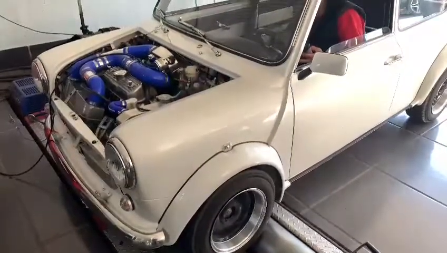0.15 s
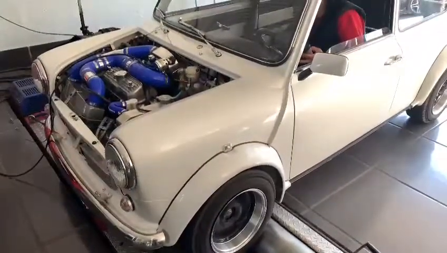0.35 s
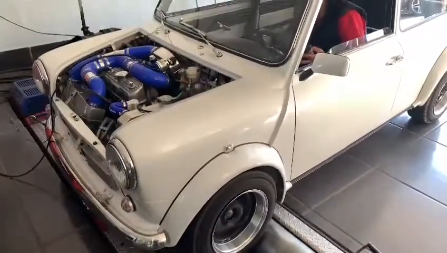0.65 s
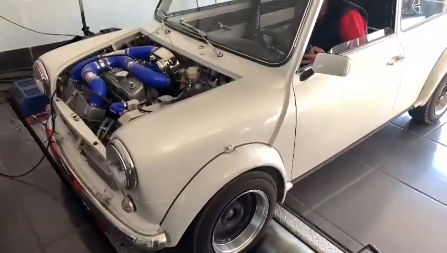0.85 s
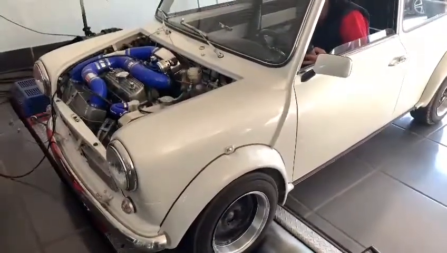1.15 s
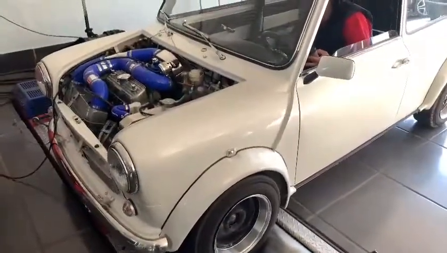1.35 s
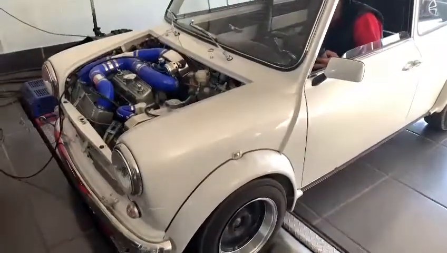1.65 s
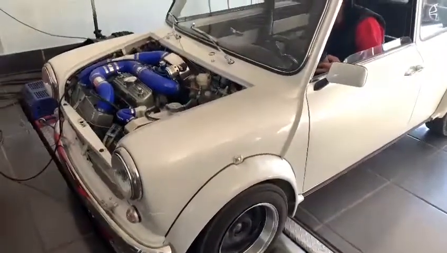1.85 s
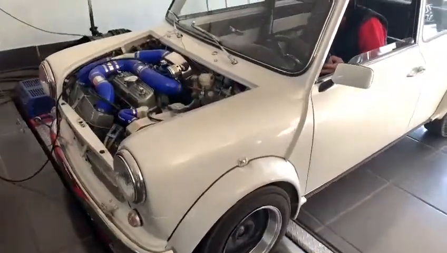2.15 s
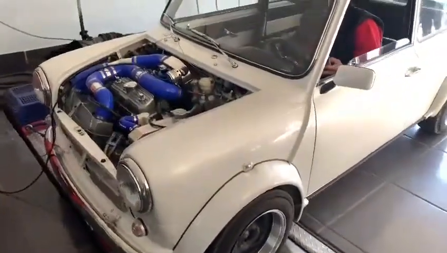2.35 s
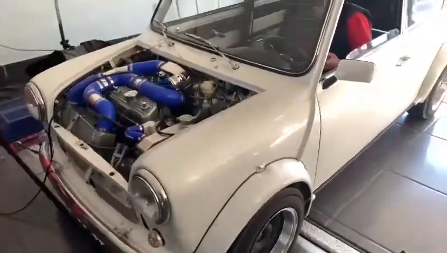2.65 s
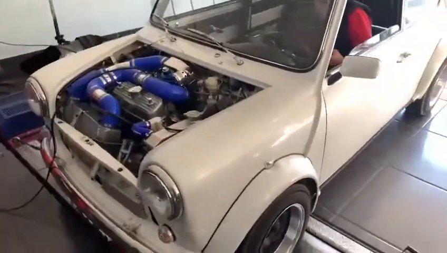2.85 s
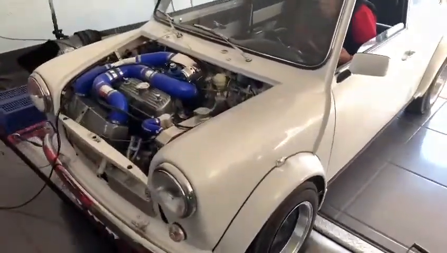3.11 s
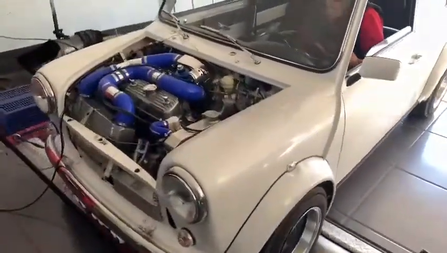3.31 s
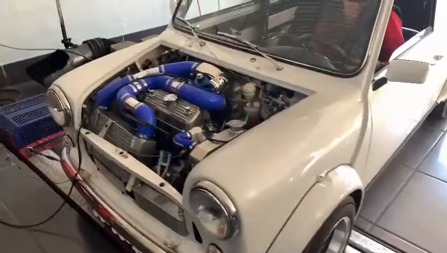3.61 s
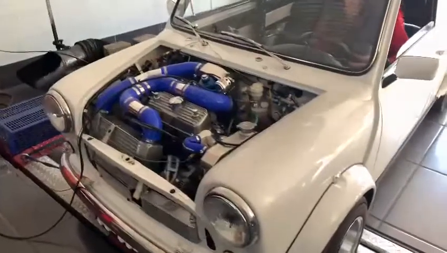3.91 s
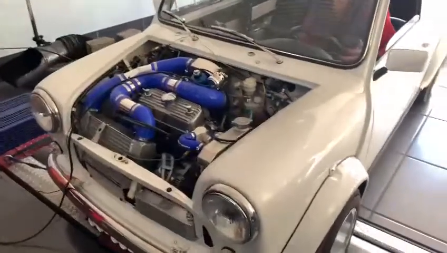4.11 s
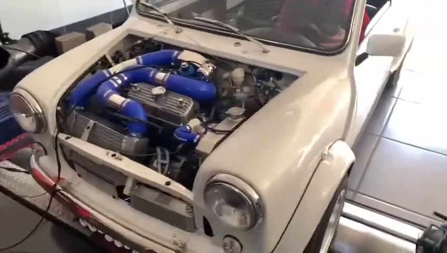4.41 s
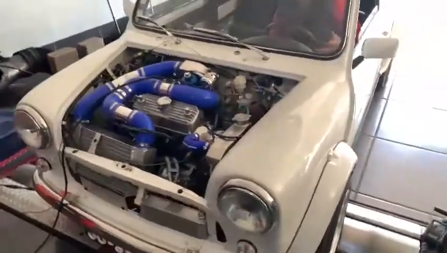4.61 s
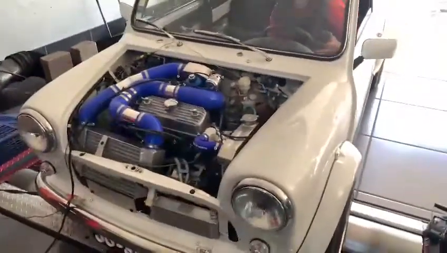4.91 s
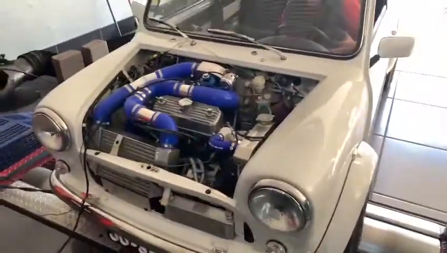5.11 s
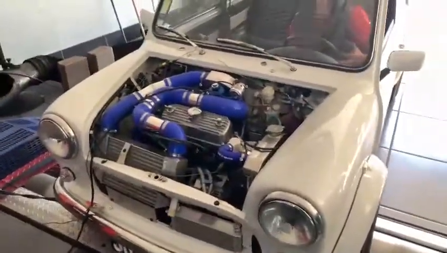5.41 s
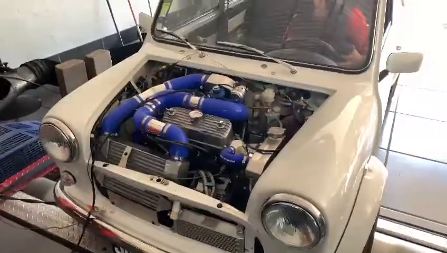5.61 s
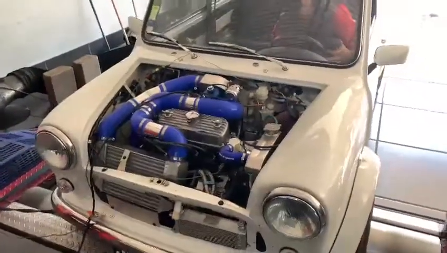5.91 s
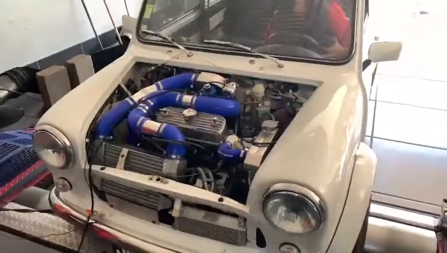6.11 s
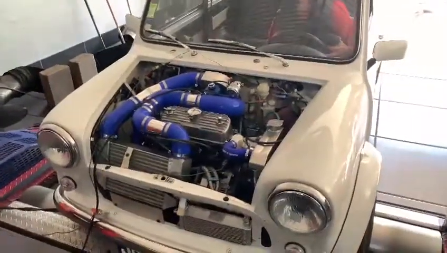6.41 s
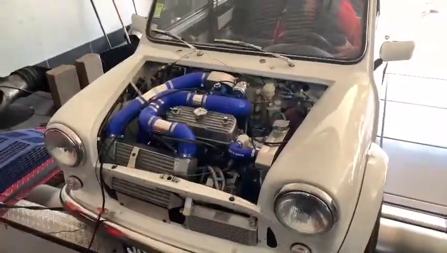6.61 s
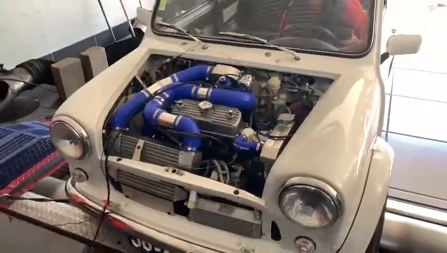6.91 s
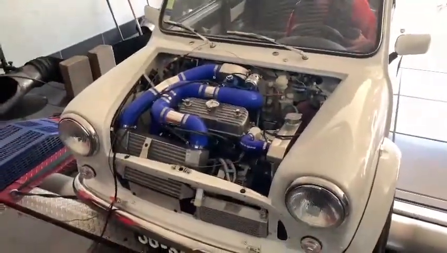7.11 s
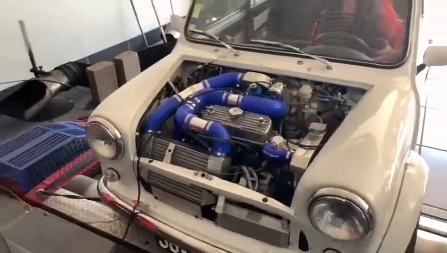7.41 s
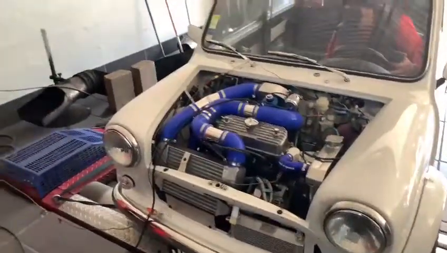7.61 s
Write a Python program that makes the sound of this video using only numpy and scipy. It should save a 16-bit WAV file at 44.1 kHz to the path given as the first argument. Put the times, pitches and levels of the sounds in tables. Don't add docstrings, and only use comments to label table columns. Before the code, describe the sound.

A small turbocharged car engine idles steadily in a tiled workshop, humming and whirring, its gear whine sharpening as the microphone moves toward the nose.

```python
import sys
import numpy as np
from scipy import signal
from scipy.io import wavfile
from scipy.ndimage import uniform_filter1d

SR = 44100
rng = np.random.default_rng(int(sys.argv[2]) if len(sys.argv) > 2 else 0)


def persist_wave(psi):
    counts = np.round(np.clip(psi, -1, 1) * 32767).astype(np.int16)
    wavfile.write(sys.argv[1], SR, np.atleast_2d(counts).T)


def gain_from_decibels(decibels):
    exponent = np.asarray(decibels, float) / 20
    return 10 ** exponent


N = 341775

# (time [s], place [0-3])
WALK_PLACE = [
    (0, 0),
    (2.2, .05),
    (3.1, 1),
    (4.3, 2),
    (5.5, 2.9),
    (7.75, 3),
]
# (time [s], view [0-3])
WALK_VIEW = [
    (0, 0),
    (1.4, .1),
    (2.7, .5),
    (3.0, 1),
    (4.76, 1.15),
    (4.87, 2),
    (5.4, 2.1),
    (5.9, 3),
    (7.75, 3),
]
# (time [s], share [0-1])
WALK_SHARE = [
    (0, 0),
    (2.0, 0),
    (2.8, .3),
    (3.6, .52),
    (4.4, .7),
    (5.6, .87),
    (7.75, 1),
]
# (centre [s], half length [s], line [Hz], gain [dB])
GLINTS = [(7.78, 0.77, 166, 5.5), (7.75, 0.24, 582, 0), (7.5, 0.61, 250, -3), (6.9, .7, 208, -3),
          (4.83, .3, 958, -9), (4.25, 0.36, 958, 3), (2.6, 0.34, 958, -2.5), (4.4, 0.23, 333, -13),
          (5.0, 0.062, 1915, 2.5), (2.2, .35, 2870, -11), (3, 0.25, 2870, -5), (4.5, 0.097, 2870, 7),
          (6.12, .15, 2870, -4.5), (6, 0.11, 2870, 7), (7.3, .12, 2870, 0), (5.9, 0.24, 3830, -1.5),
          (1.9, .4, 3830, 0.5), (4.3, 1.2, 5745, -8.5), (3.26, 0.17, 502, 10.5), (4.8, .3, 720, -27),
          (8.7, 0.11, 580, 10), (1.2, 0.26, 566, -2), (3.68, 0.17, 566, -8), (6.5, .12, 430, 9),
          (7.1, .2, 530, -11), (4.79, 0.16, 682, 10.5), (2.75, 0.14, 416, 4.5), (6.4, .2, 502, 2.5),
          (5.4, .3, 566, 0)]

# (time [s], firing rate [Hz])
FIRING_HZ = [
    (0.0, 41.595),
    (0.75, 41.61),
    (2.0, 41.56),
    (2.4, 41.58),
    (2.8, 41.545),
    (3.75, 41.56),
    (4.75, 41.64),
    (5.5, 41.675),
    (6.5, 41.665),
    (7.75, 41.6),
]
# (firing order, wing [dB], wheel arch [dB], headlamp [dB], nose [dB])
HUM_ORDER_DB = [(1, -62, -67, -59, -55), (2, -26.5, -31.5, -36.5, -52), (3, -28.5, -28, -31, -30),
                (4, -22, -21, -24, -28.5), (5, -36, -29.5, -29, -31.5), (6, -60, -34, -31, -37),
                (7, -39, -37, -31.5, -36), (8, -32.5, -27.5, -43, -32.5), (9, -76, -52, -44, -42),
                (10, -39, -37.5, -37, -54), (14, -36.5, -44, -49, -45.5), (16, -46, -56, -39.5, -48),
                (17, -49.5, -71, -52, -54), (18, -49, -48, -45, -55), (20, -48.5, -61, -52, -49),
                (25, -47.5, -51, -59, -47.5)]
# (place [0-3], order 2 [dB], order 4 [dB], others [dB])
HUM_PAN_DB = [(0, -3.5, -3.2, -7.5), (1, -5, -6.5, -6), (2, -6, -13, -7.5), (2.25, -10, -17, -6),
              (2.8, -6, -2.5, -5), (3, -5, -1.5, -5.5)]
HUM_LEAD_RAD = {2: (-.3, -.5), 5: (-1.3, -.35), 6: (0, -.9), 7: (-1.3, -.1), 8: (-.7, .7), 10: (3, -.3),
                14: (-.1, -.1)}

# (view [0-3], mesh tone [dB], 2nd harmonic [dB], 3rd [dB], upper harmonics [dB])
WHINE_DB = [(0, -49, -39.5, -31.5, -40.5), (1, -34.5, -36, -32.5, -41), (2, -35.5, -33, -53.5, -43.5),
            (3, -28.5, -35, -39.5, -39.5)]
WHINE_UPPER_DB = [2, -4, -4, -12.5, -19]
WHINE_LOW_LEAD = [(0, .6, 4.3, 4.2), (.33, 1.1, 3.6, 4), (.4, 1.6, 5.9, 4.4), (.6, 1.2, 6.4, 4.8),
                  (1, .6, 3.2, 5.1), (1.15, 1.3, 3.1, 5.3), (2, -1, .3, 4.5), (3, .35, 1.15, 5.8)]
WHINE_UPPER_LEAD_RAD = [-2, 1.5, 7.5, 8.5, -1]

# (view [0-3], order 39 [dB], 44 [dB], 53 [dB], 90 [dB])
FAN_DB = [(0, -36, -39.5, -44.5, -46), (1, -43.5, -40.5, -44, -43), (2, -30, -34, -45, -41.5),
          (3, -28, -34.5, -45, -39.5)]
FAN_WING_LEAD_RAD = [2, -0.39, -0.14, 1.8]
# (shaft order, wing [dB], nose [dB])
FAN_WEAK_DB = [(34, -71, -45.5), (37, -43.5, -49), (38, -81, -75), (40, -75, -42), (42, -64, -44),
               (55, -48.5, -66), (77.2, -47.5, -67), (77, -73, -55), (84.6, -61, -48), (91.9, -84, -52),
               (91.4, -45, -37.5), (101.3, -52, -52), (102.1, -42.5, -68), (103.5, -40, -53),
               (104.8, -50, -56), (107.25, -68, -41.5), (110.3, -44, -56), (152.9, -47, -49.5),
               (164.2, -47, -70), (185.6, -68, -83), (238, -97, -45), (236.7, -46, -38.5)]

# (frequency [Hz], wing [dB per Hz], corner [dB per Hz], nose [dB per Hz])
ROAR_DB = [(25.0, -79, -75.9, -80), (55.0, -71, -74, -76), (97, -58.5, -54.5, -55),
           (192, -59.5, -59.5, -56.5), (423, -62.5, -58.5, -63), (614, -60, -66.5, -61),
           (910, -67, -62.5, -63.5), (1205, -60, -60.5, -59.5), (1537, -65.5, -64, -63.5),
           (2286, -63.5, -63, -61.5), (2950, -63.5, -63, -65), (3995, -70, -70.5, -67),
           (6330, -77, -71.5, -71.5), (11000, -79, -77.5, -77)]
ROAR_PASS_S = [2.2, 3.65, 6.8]
# (centre [Hz], width [Hz], gain [dB])
ROAR_RINGS = [(307, 22, 4), (560, 57, 4.5), (937, 110, 5), (1080, 170, 1), (1798, 220, 1.5),
              (2139, 43, 7.5), (2853, 43, 9), (3170, 150, 2), (3852, 70, 8), (4780, 100, 1.5),
              (5740, 51, 9.5), (6588, 580, 5), (7620, 560, -3), (8950, 1600, 7), (375, 44, -6.5),
              (1647, 170, -1.5), (2327, 130, -4), (3174, 240, -2.5)]
# (frequency [Hz], common share [0-1], left over right [dB])
PORT_SPREAD = [(30, .85, -.5), (150, .9, -3.5), (500, .75, .3), (1200, .5, 1.5), (2200, .3, -.8),
               (3300, .35, -1.8), (4500, .65, -1.5), (5600, .3, -3.5), (6500, .45, -.6), (7200, .8, 0),
               (11000, .75, 0)]

JOINT_BAND_LINES = [64, 72, 80, 88, 96, 108, 120, 132, 144, 160, 176, 196, 216, 240, 264, 292, 320, 352, 384,
                    416, 448, 480, 496, 506, 556]
# (frequency [Hz], starving margin of mid or side under the other [dB], step over band
# level [dB])
JOINT_STARVE = [(1640, 6.0, .5), (1950, 8.5, -3), (2400, 5.5, 1), (2850, 8.5, -2.5), (3350, 2.2, 2.5),
                (3900, 7.0, -1.5), (4400, 4.5, 1), (5400, 2.2, 2), (5900, 5.5, -1), (6500, 5.0, 0),
                (7200, 2.0, -1.5), (7900, 1.4, -1), (8600, .2, -3), (10000, .3, -1.5), (10500, 4.5, 2.5),
                (10800, 1.0, 5), (11300, -30, 5)]

FAN_SHAFT_HZ, PORT_DELAY_S = 12.865, .000214
START_CYCLES = .385


def evened(x):
    return x / np.sqrt(np.mean(x ** 2) + 1e-20)


def columns(table, t):
    s, *rest = np.transpose(table)
    return [np.interp(t, s, c) for c in rest]


def drift(rate_hz, count):
    steps = rng.standard_normal((N // 64 + 802, count))
    low_pass = signal.butter(2, rate_hz * 128 / SR, output="sos")
    slow = signal.sosfiltfilt(low_pass, steps, axis=0)[400:-400]
    return [evened(np.interp(np.arange(N) / 64, np.arange(len(c)), c)) for c in slow.T]


def tone(db, angle, pan_db, lead_rad):
    side = np.array([[.5], [-.5]])
    wave = np.sqrt(2) * gain_from_decibels(db + side * pan_db) * np.cos(angle + side * lead_rad)
    return wave / np.sqrt(np.cosh(pan_db * np.log(10) / 20))


def glint_db(t, hz):
    return sum(db * np.exp(-((t - s) / half) ** 2)
               for s, half, line_hz, db in GLINTS if abs(line_hz / hz - 1) < .012)


def hum(t, turns):
    place = columns(WALK_PLACE, t)[0]
    pan_two, pan_four, pan_rest = columns(HUM_PAN_DB, place)
    walk = columns(WALK_SHARE, t)[0]
    arch_rad = np.interp(place, [0, 1.2, 2.1, 2.4], [0, .14, .18, 0])
    shake = drift(38.0, count=2 * len(HUM_ORDER_DB))
    out = np.zeros((2, N))
    for n, (k, *db) in enumerate(HUM_ORDER_DB):
        k = round(k)
        pan_db = pan_two if k == 2 else pan_four if k == 4 else pan_rest * (k < 10)
        if k in (5, 6, 8):
            pan_db = pan_db * np.minimum(place + .2, 1)

        if 4 < k < 8:
            path_rad = .4 - 1.35 * (k - 5) - (3.6 + .9 * (k - 5)) * walk
        elif k == 8:
            path_rad = 1.5
        else:
            path_rad = .3 * (k - 3.6) ** 2 - (k == 2) * (walk - .2)
        if k % 4 == 0 or k == 10:
            path_rad = path_rad - k * arch_rad
        angle = 2 * np.pi * k * turns + path_rad + 0.0081 * k * shake[2 * n]

        level_db = np.interp(place, range(len(db)), db) + glint_db(t, k * FIRING_HZ[0][1])
        level_db += (0.049 + 0.11 * k) * shake[2 * n + 1]
        if k == 4:
            lead_rad = np.interp(place, [1.9, 2.4], [-.3, 1])
        else:
            lead_rad = np.interp(place, [0, 1.6], HUM_LEAD_RAD.get(k, (0, 0)))
        out += tone(level_db, angle, pan_db, lead_rad)
    return out


def whine(t, turns):
    view = columns(WALK_VIEW, t)[0]
    *db, upper_db = columns(WHINE_DB, view)
    db += [upper_db + step for step in WHINE_UPPER_DB]
    lead_rad = columns(WHINE_LOW_LEAD, view) + WHINE_UPPER_LEAD_RAD
    backlash, *flutter = drift(26.0, count=2 * len(db) + 1)
    fade = drift(3.0, count=len(db))
    surge = .22 * np.sin(2 * np.pi * turns / 4)
    mesh = 2 * np.pi * 23 * turns + surge + .24 * backlash
    load_db = 0.8 * np.cos(2 * np.pi * (turns - 1.65) / 4)
    out = np.zeros((2, N))
    for k, level_db in enumerate(db):
        level_db = level_db + glint_db(t, (k + 1) * 23 * FIRING_HZ[0][1])
        level_db = level_db + 2.5 * fade[k] * min(k / 5, 1) + .8 * flutter[2 * k] + load_db * min(k, 2)
        out += tone(level_db, (k + 1) * mesh, 1.5 - 0.65 * k, lead_rad[k] + 0.41 * flutter[2 * k + 1])
    return out


def fan(t):
    nose = np.clip((t - 2.5) / 3.1, 0, 1)
    view = columns(WALK_VIEW, t)[0]
    lines = list(zip((39, 44, 53, 90), columns(FAN_DB, view), FAN_WING_LEAD_RAD))
    lines += [(round(k), wing + (front - wing) * nose, 0) for k, wing, front in FAN_WEAK_DB]
    waver = drift(3.6, count=2 * len(lines))
    out = np.zeros((2, N))
    for n, (k, db, wing_lead) in enumerate(lines):
        hz = k * FAN_SHAFT_HZ
        level_db = db + glint_db(t, hz) + (1.1 + 0.0039 * k) * waver[2 * n]
        angle = 2 * np.pi * hz * t + n ** 2 + .006 * k * waver[2 * n + 1]
        lead_rad = 2 * np.pi * hz * PORT_DELAY_S + wing_lead * np.clip(1 - view, 0, 1)
        out += tone(level_db, angle, 0.32, lead_rad)
    return out


def roar(turns):
    frames, hz = N // 256 + 5, np.fft.rfftfreq(1024, 1 / SR)
    a, b, c, d, patches = rng.standard_normal((frames, 513, 5)).T
    patches = uniform_filter1d(patches, size=6, axis=0)
    patches = evened(uniform_filter1d(patches, size=11, axis=1))

    def logged(table):
        return columns([(np.log(f), *v) for f, *v in table], np.log(hz + 1))

    places = np.transpose(logged(ROAR_DB))
    frame_s = np.arange(frames) * 256 / SR
    db = np.array([np.interp(frame_s, ROAR_PASS_S, row) for row in places])
    db += sum(gain_db / (1 + (2 * (hz - f) / width) ** 2) for f, width, gain_db in ROAR_RINGS)[:, None]

    same, pan_db = logged(PORT_SPREAD)
    same = np.clip(same, 0, 1)[:, None]
    pan = gain_from_decibels(pan_db / 2)[:, None]
    late = np.exp(-2j * np.pi * hz * PORT_DELAY_S)[:, None]
    left = a + 1j * b
    right = same * left * late + np.sqrt(1 - same ** 2) * (c + 1j * d)
    z = np.array([left * pan, right / pan]) * gain_from_decibels(db + 1.58 * patches + 18.0)
    air = signal.istft(z, nperseg=1024, noverlap=768)[1][:, :N]
    throb = .05 * np.cos(2 * np.pi * (turns + .1)) + .03 * np.cos(2 * np.pi * (turns - 1.65) / 4)
    return air * (1 + throb)


def scene():
    t = np.arange(N) / SR
    turns = START_CYCLES + np.cumsum(columns(FIRING_HZ, t)[0]) / SR
    return hum(t, turns) + whine(t, turns) + fan(t) + roar(turns)


def starve(x):
    n, k = np.arange(2048), np.arange(JOINT_BAND_LINES[-1])
    basis = np.cos(np.pi / 1024 * np.outer(n + 512.5, k + .5)) * np.sqrt(2 / 1024)
    basis *= signal.windows.kaiser_bessel_derived(2048, 4 * np.pi)[:, None]
    lead_in = 2048 - 563
    pair = np.pad([x[0] + x[1], x[0] - x[1]], ((0, 0), (lead_in, 3072))) / 2
    at = np.arange(0, pair.shape[1] - 2048, 1024)[:, None] + n
    lines = pair[:, at] @ basis
    error = np.zeros_like(lines)
    budget = rng.standard_normal((len(at), len(JOINT_BAND_LINES)))
    budget = evened(uniform_filter1d(budget, size=3, axis=0))
    for band, (low, high) in enumerate(zip(JOINT_BAND_LINES, JOINT_BAND_LINES[1:])):
        part = lines[:, :, low:high]
        power = uniform_filter1d(np.median(part ** 2, axis=2), size=3, axis=1) / .455
        level_db = 10 * np.log10(power + 1e-20)
        margin_db, step_db = columns(JOINT_STARVE, (low + high) * SR / 4096)
        mid_over_side = level_db[0] - level_db[1]
        starved = np.array([-mid_over_side > margin_db, mid_over_side > abs(margin_db)])
        starved_db = 9.5 if low < 320 or low == 352 else 14
        step_db = level_db.max(0) + step_db + 1.5 * (low < 292) + 3.2 * budget[:, band]
        step = gain_from_decibels(step_db + starved_db * starved)[:, :, None]
        rounded = np.floor(abs(part / step) ** .75 + .4054) ** (4 / 3)
        error[:, :, low:high] = np.sign(part) * step * rounded - part
    for channel, frames in zip(pair, error @ basis.T):
        np.add.at(channel, at, frames)
    mid, side = pair[:, lead_in:][:, :N]
    return np.array([mid + side, mid - side])


def band_limit(x):
    return signal.sosfilt(signal.butter(12, 11890, fs=SR, output="sos"), x)


def record(dry):
    edge = signal.firwin(255, 12300, window=("kaiser", 9), fs=SR)
    mix = starve(signal.oaconvolve(dry, edge[None], "same"))
    return band_limit(mix)


dry = scene()
out = record(dry)
persist_wave(out)
```